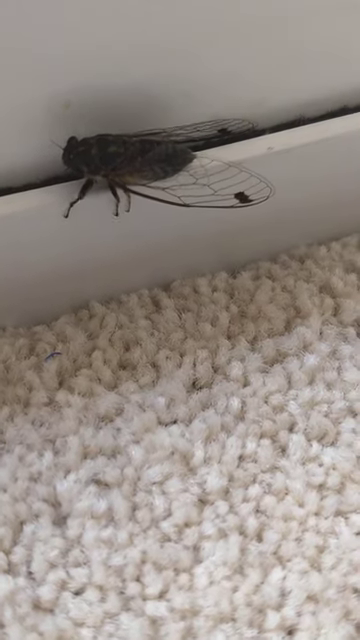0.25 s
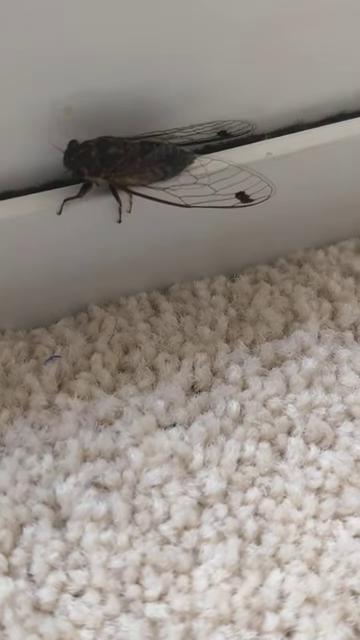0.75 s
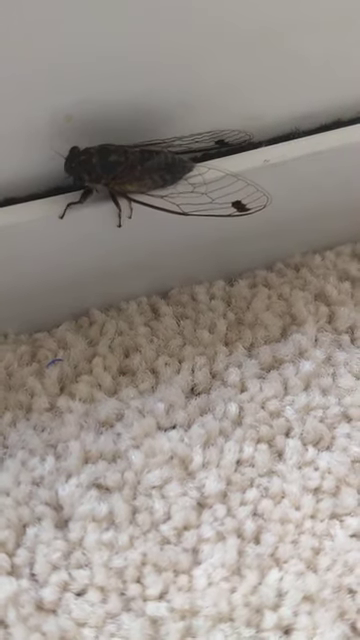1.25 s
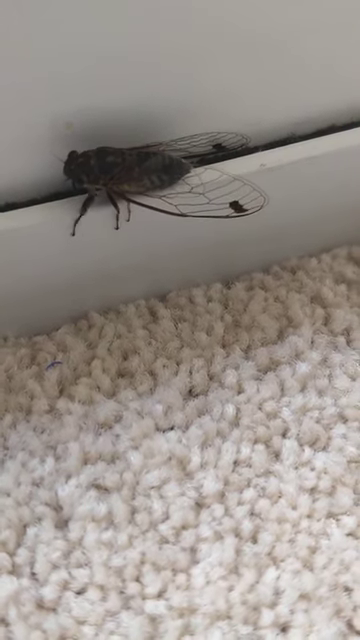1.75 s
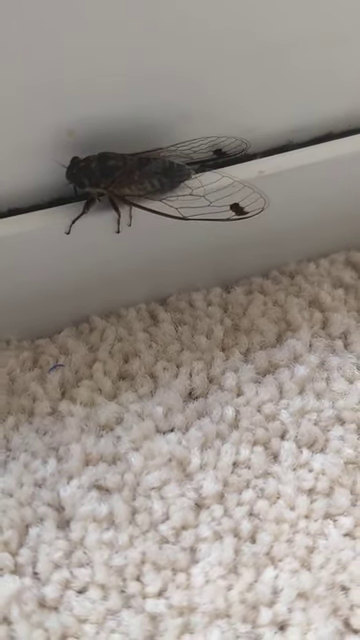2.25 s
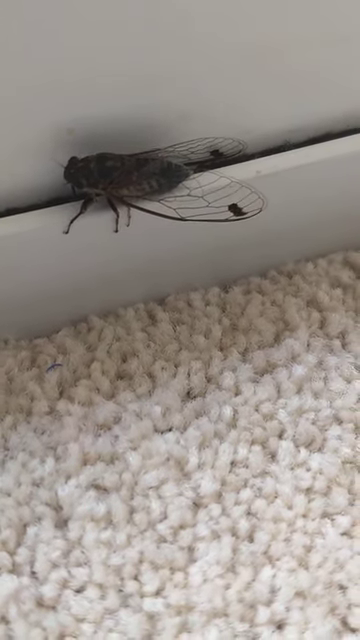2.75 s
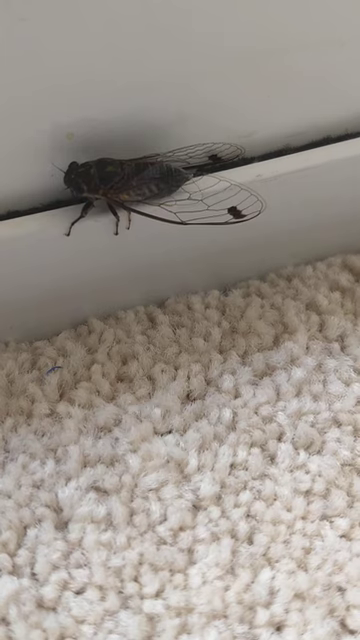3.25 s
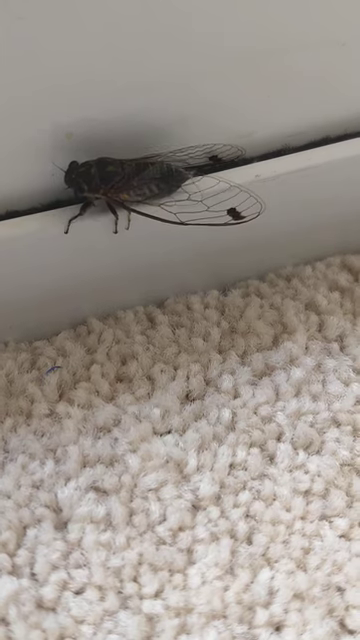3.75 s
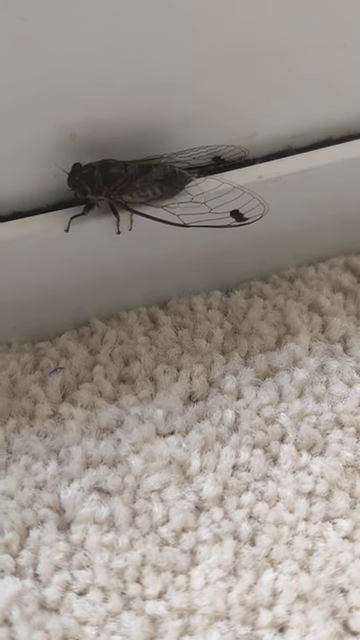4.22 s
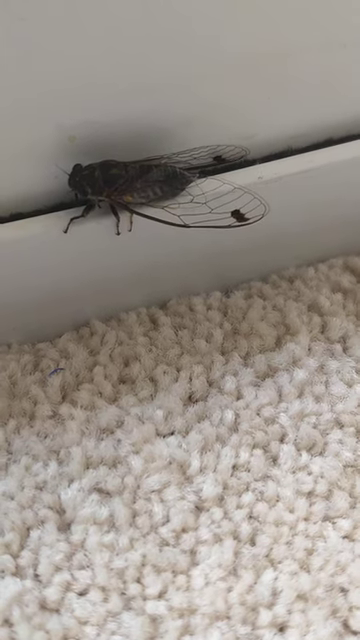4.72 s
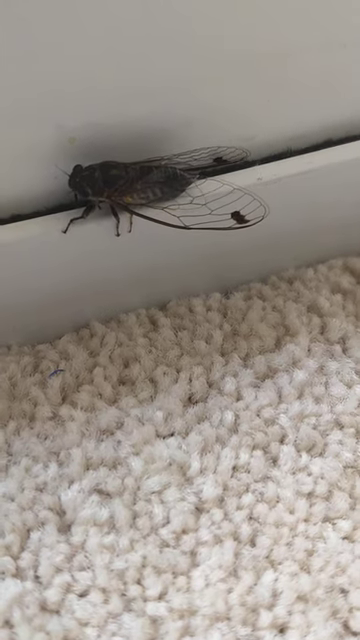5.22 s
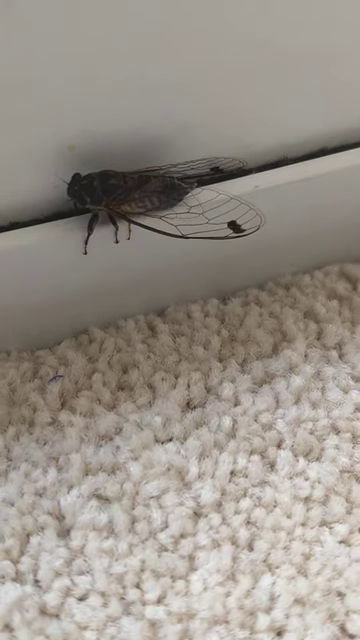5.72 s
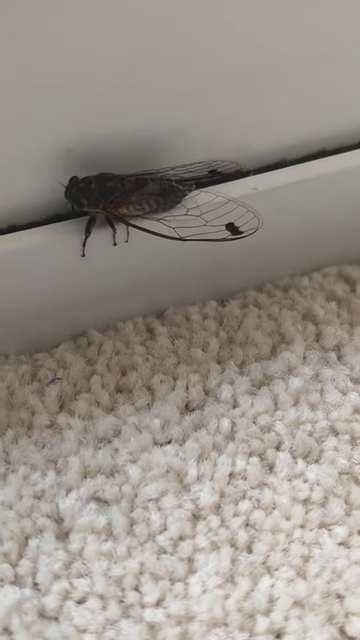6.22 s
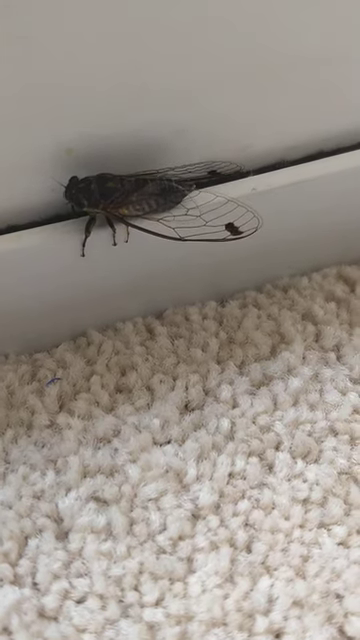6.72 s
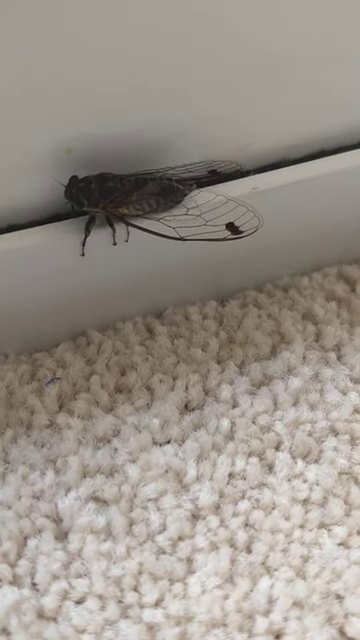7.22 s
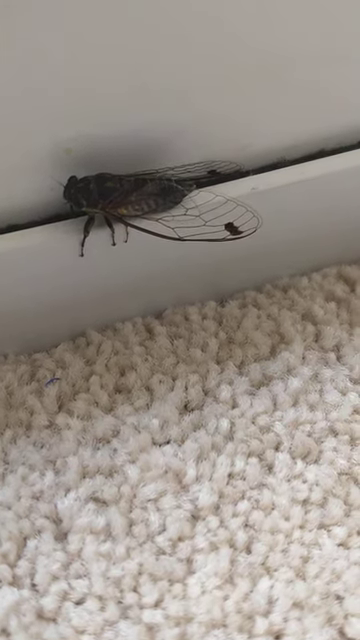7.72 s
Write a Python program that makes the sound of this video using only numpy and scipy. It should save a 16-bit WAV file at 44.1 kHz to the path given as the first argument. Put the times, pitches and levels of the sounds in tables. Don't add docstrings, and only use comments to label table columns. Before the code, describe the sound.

A close indoor insect song: thin, crisp ticking at first, like a tiny fast rattle, then a tighter and steadier rasp, finally a shrill metallic buzz. Faint room hum and microphone hiss lie beneath, sinking as the song grows. A soft low knock comes early and a barely audible far squeak midway. The room is dry with almost no echo, and the sound ends abruptly while still rising.

```python
import sys
import numpy as np
from scipy import signal
from scipy.fft import rfft, irfft, next_fast_len
from scipy.io import wavfile
from scipy.ndimage import uniform_filter1d

SR = 44100
rng = np.random.default_rng(int(sys.argv[2]) if len(sys.argv) > 2 else 0)


def gain_from_decibels(decibels):
    exponent = np.asarray(decibels, float) / 20
    return 10 ** exponent


def unload_wav(signal):
    wavfile.write(
        sys.argv[1],
        SR,
        np.round(np.clip(np.atleast_2d(signal).T, -1, 1) * 32767).astype(np.int16),
    )


N = 351477
RIGHT_LAG_S = 19 / 44100


def evened(x):
    return x / np.sqrt(np.mean(x ** 2) + 1e-20)


def read(points, hz):
    f, value = np.transpose(points)
    return np.interp(np.log(hz + 1), np.log(f + 1), value)


def follow(rows, t):
    s, *columns = np.transpose(rows)
    return np.array([np.interp(t, s, column) for column in columns])


def coloured(x, points, lag_s=0, turn=0):
    size = next_fast_len(N, True)
    hz = np.fft.rfftfreq(size, 1 / SR)
    response = gain_from_decibels(read(points, hz)) * np.exp(1j * (turn - 2 * np.pi * hz * lag_s))
    return irfft(rfft(x, size) * response, size)[..., :N]


def ring(t, hz, rise_ms, fall_ms, glide_hz, turn):
    ms = t * 1000
    shape = np.exp(-np.where(t < 0, (-ms / rise_ms) ** 3, (ms / fall_ms) ** 2))
    return shape * np.cos(2 * np.pi * (hz + glide_hz * ms / 2) * t + turn)


def noise(points, patchy_db):
    # (frequency [Hz], likeness [0-1])
    likeness = [(40, 0.67), (125, 0.48), (250, 0.49), (500, 0.87), (1200, 0.97), (2400, 1), (4000, 0.39),
                (9000, 0.29)]
    # (frequency [Hz], turn [radians])
    port_turn = [(60, 2.2), (200, 2.34), (500, 1.6), (1200, 3.21)]
    frames, hz = N // 512 + 5, np.fft.rfftfreq(2048, 1 / SR)
    a, b, c, d, patches = rng.standard_normal((frames, 1025, 5)).T
    patches = uniform_filter1d(patches, size=12, axis=0)
    patches = evened(uniform_filter1d(patches, size=8, axis=1))
    same = np.clip(read(likeness, hz), 0, 1)[:, None]
    late = np.exp(1j * (read(port_turn, hz) - 2 * np.pi * hz * RIGHT_LAG_S))[:, None]
    left, own = a + 1j * b, c + 1j * d
    z = np.array([left, same * late * left + np.sqrt(1 - same ** 2) * own])
    z *= gain_from_decibels(read(points, hz)[:, None] + patchy_db * patches)
    return evened(signal.istft(z, nperseg=2048, noverlap=1536)[1][:, :N])


def hiss():
    # (frequency [Hz], level [dB per Hz])
    spectrum = [(1200, -14), (1800, -4), (2400, -5), (3200, -3.5), (4300, 3.5), (6000, -13), (9000, -6),
                (12000, -21.5), (16500, -34)]
    return gain_from_decibels(-60) * noise(spectrum, 1.0)


def mains(t, hum_db):
    # (frequency [Hz], level [dB])
    appliance_tones = [(50, -66), (76, -65.5), (266.7, -72), (311.2, -72.5)]
    drift = rng.standard_normal((len(appliance_tones), N))
    drift = uniform_filter1d(drift, size=9000).cumsum(1) * 0.0198
    tones = sum(gain_from_decibels(db) * np.sin(2 * np.pi * hz * t + d) for (hz, db), d in zip(appliance_tones, drift))
    return gain_from_decibels(hum_db + 59) * tones * gain_from_decibels([[1], [-1]])


def house_hum(t, gain_db):
    # (frequency [Hz], level [dB per Hz])
    spectrum = [(22, -39), (38, -7), (59, 2), (80, 0), (212, -6.5), (264, -8), (375, -13.5), (413, -11.5),
                (577, -13.5), (634, -11.5), (1020, -10), (1340, -18.5), (1700, -23.5), (2210, -45),
                (3740, -120)]
    # (time [s], height [dB], half width [s])
    swells = [
        (1.9, 1, 0.029),
        (4.05, 0.5, 0.14),
        (5.88, 2.0, 0.057),
        (6.9, 1, 0.064),
    ]
    hum_db = -57.5 + gain_db
    hum_db = hum_db + sum(db * np.exp(-((t - s) / half) ** 2) for s, db, half in swells)
    return gain_from_decibels(hum_db + 4.0) * noise(spectrum, 1.1) + mains(t, hum_db)


def squeak(t):
    # (time [s], pitch [Hz], level [dB])
    path = [(3.98, 765.4, -65), (3.998, 746, -64), (4.06, 773, -62), (4.07, 769, -77), (4.114, 796, -56),
            (4.184, 782, -69), (4.2, 783, -72)]
    hz, db = follow(path, t)
    on = (t > path[0][0]) & (t < path[-1][0])
    return uniform_filter1d(on * gain_from_decibels(db + 2.5), size=900) * np.sin(2 * np.pi * np.cumsum(hz) / SR)


def knocks(t):
    # (time [s], level [dB])
    bumps = [
        (0.245, -41),
    ]
    total = 0
    for s, db in bumps:
        push = ring(t - s, 105, 12, 22, 0.63, 0)
        overtone = ring(t - s, 172, 8, 25, 0.66, 0)
        total = total + gain_from_decibels(db - 3.5) * (push + 0.42 * overtone)
    return total


def phone_gain_db(t):
    step_times = [3.125, 3.555, 4.33, 6.082, 7.285]
    step_db, step_s = -2.0, .006
    return sum(step_db * np.clip((t - s) / step_s + .5, 0, 1) for s in step_times)


def turns(tension, at, order):
    return 1 / (1 + (tension / at) ** order)


def across(rows, tension):
    slack, half, taut = np.transpose(rows)[..., None]
    bend = 4 * half - 2 * slack - 2 * taut
    return slack + (taut - slack) * tension + bend * tension * (1 - tension)


def pull_times():
    # (time [s], pulls made so far [count])
    pace = [(.0263, 0), (.3855, 16), (.7689, 34), (1.1553, 53), (1.5277, 73), (1.9804, 98), (2.5172, 128),
            (2.7112, 140), (3.1703, 170), (3.5268, 194), (3.98, 226), (4.5457, 268), (4.9669, 301),
            (5.5841, 352), (6.2012, 406), (6.8183, 462), (7.4357, 519), (7.9726, 569)]
    slack_per_s, taut_per_s = 45, 93
    s, done = np.transpose(pace)
    even = np.interp(np.arange(done[-1] + 1), done, s)
    gap = np.interp(np.arange(len(even)), (done[1:] + done[:-1]) / 2, np.diff(s) / np.diff(done))
    tension = np.clip((1 / gap - slack_per_s) / (taut_per_s - slack_per_s), 0, 1)
    uneven = .005 + .085 * turns(tension, .52, order=6)
    walk = np.cumsum(gap * (1 + uneven * rng.standard_normal(len(even))))
    pulls = np.interp(walk, walk[done.astype(int)], s)
    return np.append(.0058, pulls), np.append(0, tension)


def tymbal():
    # (slack [ms], half tight [ms], taut [ms])
    rib_delays = [(.38, .41, .4), (2.26, 2.43, 2.48), (5.2, 5.1, 4.05), (6.1, 6.45, 5.75),
                  (6.65, 6.66, 6.69), (7.96, 8.2, 8.72)]
    # (slack [dB], half tight [dB], taut [dB])
    rib_levels = [(-1, -1, -1.5), (-1.5, 0, -1), (-6, -4.5, -4), (-38, -10, -3.5), (0, -2.5, -8),
                  (-2.5, -.5, -.5)]
    # (slack [Hz], half tight [Hz], taut [Hz])
    rib_pitches = [(8000, 8370, 8630), (8120, 8600, 8860), (8900, 8905, 8955), (9000, 8980, 8960),
                   (8850, 9120, 8740), (8370, 8640, 8810)]
    # (fall [ms], rebound delay [ms], rebound level [dB])
    rib_rings = [(.26, .7, -12), (.35, .8, -17), (.33, .85, -14), (.46, .8, -20), (.31, .75, -16),
                 (.38, .92, -15)]
    slack_felt = [.4, 1, .5, .5, .3, 1.4]
    # (frequency [Hz], level [dB])
    snap_colour = [(2500, -27), (3800, -4), (4250, 3.5), (4700, 7), (5200, 4), (11000, 17.5), (13500, 1),
                   (15500, 1), (16500, -14), (16900, -8)]
    pulls, tension = pull_times()
    luck = rng.standard_normal((len(pulls), 6, 6)).T

    middle = np.array([0, 0, 1, 1, 0, 0])[:, None]
    scatter_ms = np.where(middle, .05 + .4 * turns(tension, .68, order=8), .025)
    at = (pulls + (across(rib_delays, tension) + scatter_ms * luck[0]) / 1000) * SR

    size = gain_from_decibels(across(rib_levels, tension) + .6 * luck[1])
    size[:2] *= gain_from_decibels(-5.5 * np.exp(-(tension / .16) ** 2))
    joins_at = np.resize((.505, .65)[::-1], len(pulls))
    joins = rng.random(len(pulls)) < (tension - joins_at) / .04
    size[2:4] *= np.where(joins, 1, [[0], [gain_from_decibels(-8)]])

    hz = (across(rib_pitches, tension) + 65 * luck[2])[..., None]
    fall_ms, rebound_ms, rebound_db = np.transpose(rib_rings)[..., None, None]
    steps = np.floor(at)[..., None].astype(int) + np.arange(-30, 90)
    t, turn = (steps - at[..., None]) / SR, 0.33 * luck[3][..., None]
    slack = (.95 + (1.5 - .95) * (1 - tension) ** 1.6)[None, :, None]
    lift_hz = np.interp(tension, (0, 1), (-110, 488))[:, None]
    snap_db = np.interp(tension, (0, 1), (-4, -1.5))[:, None]
    fall_ms = fall_ms * slack ** np.array(slack_felt)[:, None, None]

    burst = ring(t, hz, .25 * slack ** .3, fall_ms, 1700 / slack, turn)
    rebound = ring(t - rebound_ms / 1000, hz + lift_hz, .25, .4, 900, 3 * luck[5][..., None])
    burst += gain_from_decibels(rebound_db + 1.5 * luck[4][..., None]) * rebound
    side_hz = 5880 + 120 * luck[5][..., None]
    burst += gain_from_decibels(-28) * ring(t - .0003, side_hz, 0.32, 0.45, 30, turn + 2.33)
    snap = ring(t, 0, 0.11, 0.15, 0, 0) * rng.standard_normal(t.shape)
    snap *= gain_from_decibels(snap_db + 2.1 * luck[4][..., None])

    tone, snaps = (np.bincount(steps.ravel(), (size[..., None] * v).ravel(), N + 999)[:N]
                   for v in (burst, snap))
    return tone + gain_from_decibels(-25.5) * coloured(snaps, snap_colour)


def walls(x, t60):
    taps = rng.choice([-1., 1.], (2, 9000)) * (rng.random((2, 9000)) < .08)
    taps *= gain_from_decibels(-60 * np.arange(9000) / SR / t60) * (np.arange(9000) > 60)
    return signal.fftconvolve(x[None], taps / np.linalg.norm(taps[0]), axes=1)[:, :N]


def cicada(t, gain_db):
    # (time [s], level [dB])
    effort = [(0, -41), (.03, -37.5), (.75, -36), (1.46, -33), (2.3, -31), (3.05, -27.5), (3.25, -27),
              (3.53, -25.3), (3.75, -24.5), (4.3, -22), (4.55, -21), (5.06, -20), (6.05, -18),
              (7.27, -15.5), (7.97, -15)]
    # (frequency [Hz], level [dB])
    right_colour = [(5000, 1.5), (7000, 2.83), (9000, -3), (11000, -3), (14000, 1)]
    song = tymbal()
    power = uniform_filter1d(uniform_filter1d(song ** 2, size=6000), size=6000)
    song /= np.sqrt(power + 1e-12)
    song *= gain_from_decibels(follow(effort, t)[0] + gain_db + 4.0)
    direct = np.array([song, coloured(song, right_colour, RIGHT_LAG_S, 2.88)])
    return direct + gain_from_decibels(-20) * walls(song, 0.011) + gain_from_decibels(-27.5) * walls(song, 0.12)


def scene():
    t = np.arange(N) / SR
    gain_db = phone_gain_db(t)
    background = hiss() + house_hum(t, gain_db)
    return background + squeak(t) + knocks(t) + cicada(t, gain_db)


def mute_moments(pair):
    # (low edge [Hz], high edge [Hz], share kept [0-1])
    bands = [(1900, 2750, .35), (2750, 3450, .6), (3450, 4150, .45), (4150, 4850, .45), (4850, 5500, .6),
             (5500, 6900, .72), (6900, 7600, .88), (7600, 9300, .98), (9300, 10300, .85),
             (10300, 11400, .65), (11400, 12400, .36), (12400, 13800, .2), (13800, 15100, .12),
             (15100, 22050, .08)]
    hz, t, z = signal.stft(pair, SR, nperseg=256, noverlap=192)
    block = np.arange(len(t)) // 4
    early = t < 4.32
    mood = rng.standard_normal(len(t))[block]
    for low_hz, high_hz, kept in bands:
        band = (hz >= low_hz) & (hz < high_hz)
        score = 10 * np.log10((abs(z[:, band]) ** 2).mean(1) + 1e-20)
        score -= .75 * uniform_filter1d(score, size=300)
        own_luck = rng.standard_normal((len(t), 2))[block].T
        score = uniform_filter1d(score, size=3) + 3.5 * mood + 3.5 * own_luck
        limit = np.quantile(score[:, early], 1 - kept, axis=1)[:, None]
        z[:, band] *= ~(early & (score < limit))[:, None]
    return signal.istft(z, SR, nperseg=256, noverlap=192)[1][:, :N]


def mute_bands(pair):
    # (start [s], low edge [Hz], high edge [Hz], share kept in mid [0-1], share kept in side [0-1])
    bands = [(4.32, 700, 1500, 1, .1), (4.32, 1550, 1750, .8, 1), (4.32, 1750, 2050, .2, 1),
             (4.32, 2050, 2750, 0, 1), (4.32, 2750, 3000, .6, 1), (4.32, 3100, 3900, 1, .03),
             (4.62, 4200, 5150, 0, 1), (4.62, 11450, 11700, .4, .08), (4.62, 11700, 12700, 0, 0),
             (4.62, 12700, 13050, .12, 0), (4.62, 13050, 13300, 1, .3), (4.62, 13750, 14450, 0, 1),
             (4.62, 14450, 15100, .6, .04), (4.62, 15100, 15750, .92, 0), (4.32, 15750, 22050, 0, 0),
             (4.32, 14450, 15750, .85, .3)]
    hz, t, z = signal.stft(pair, SR, nperseg=2048, noverlap=1536)
    for start, low_hz, high_hz, *kept in bands:
        luck = rng.random((len(t), 2))[np.arange(len(t)) // 3].T
        lost = luck > np.array(kept)[:, None]
        z[:, (hz >= low_hz) & (hz < high_hz)] *= ~(lost & (t >= start))[:, None]
    weak = ((hz > 1400) & (hz < 5000) | (hz > 12700))[:, None] & (t > 4.62)
    around = uniform_filter1d(uniform_filter1d(abs(z), size=15, axis=1), size=5, axis=2)
    z *= ~(weak & (abs(z) < 1.2 * around))
    return signal.istft(z, SR, nperseg=2048, noverlap=1536)[1][:, :N]


def thin_out(x):
    pair = np.array([x[0] + x[1], x[0] - x[1]])
    mid, side = mute_bands(mute_moments(pair))
    return np.array([mid + side, mid - side]) / 2


def roll_off(x):
    return signal.sosfilt(signal.butter(12, 16970, fs=SR, output="sos"), x)


def record(dry):
    # (frequency [Hz], level [dB])
    bass_cut = [(20, -24), (33, -7), (44, -7.5), (52, 1.5), (20000, 0)]
    mix = thin_out(coloured(dry, bass_cut))
    return roll_off(mix)


dry = scene()
out = record(dry)
unload_wav(out)
```